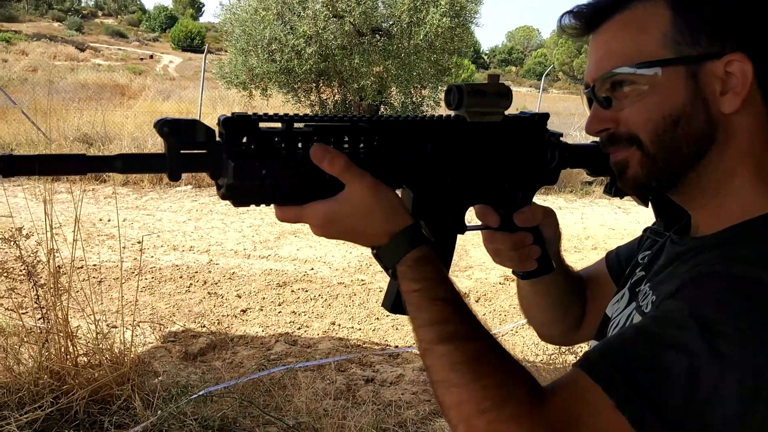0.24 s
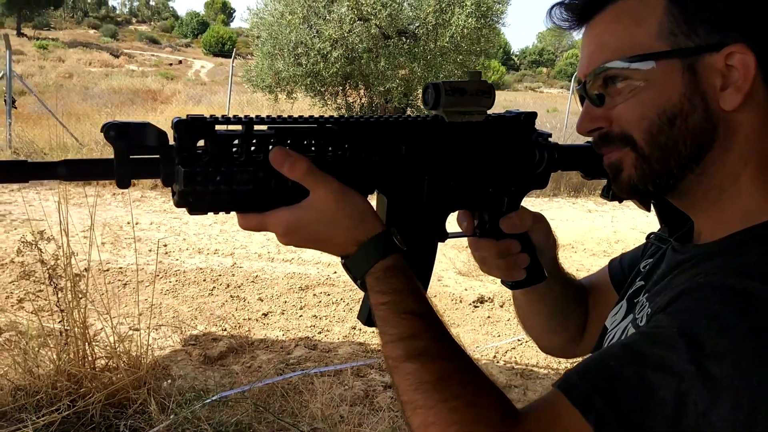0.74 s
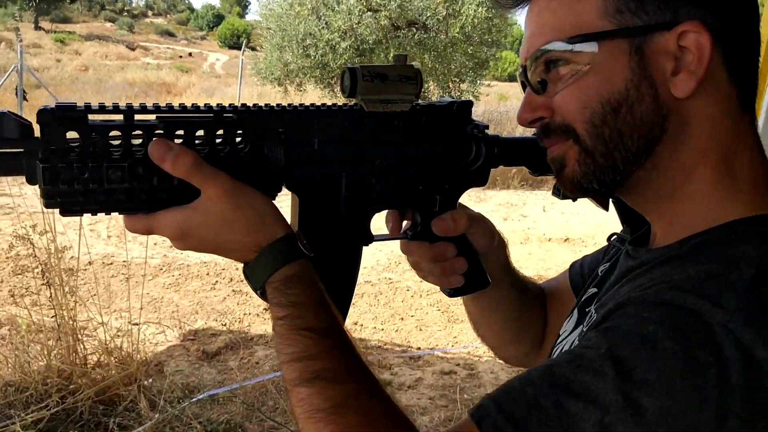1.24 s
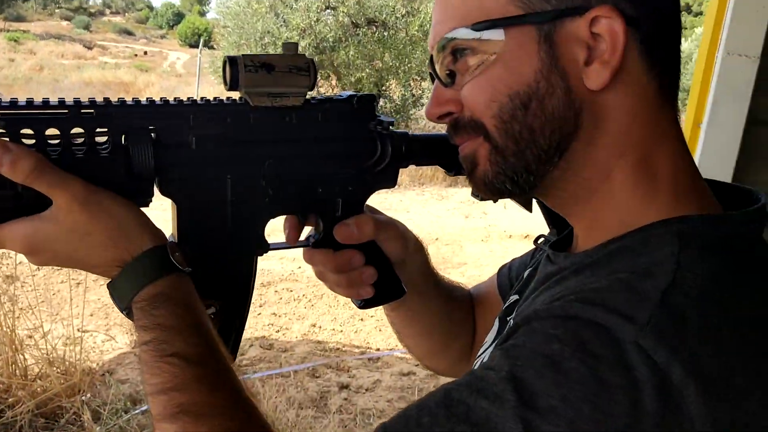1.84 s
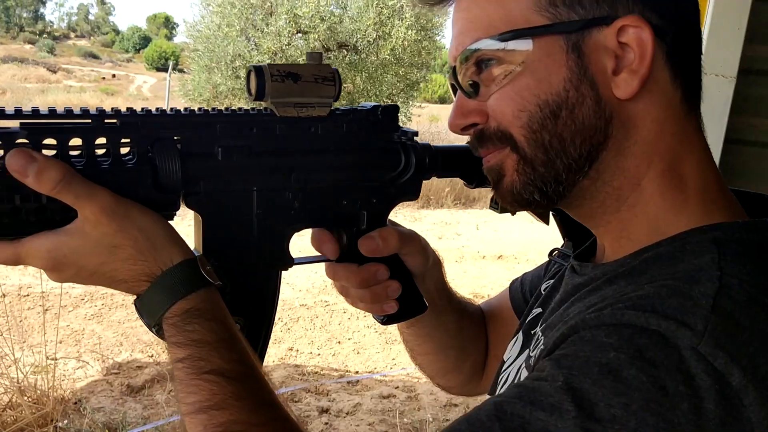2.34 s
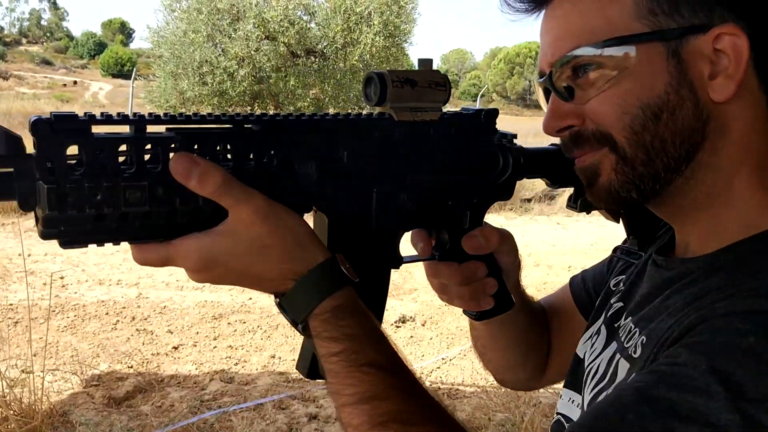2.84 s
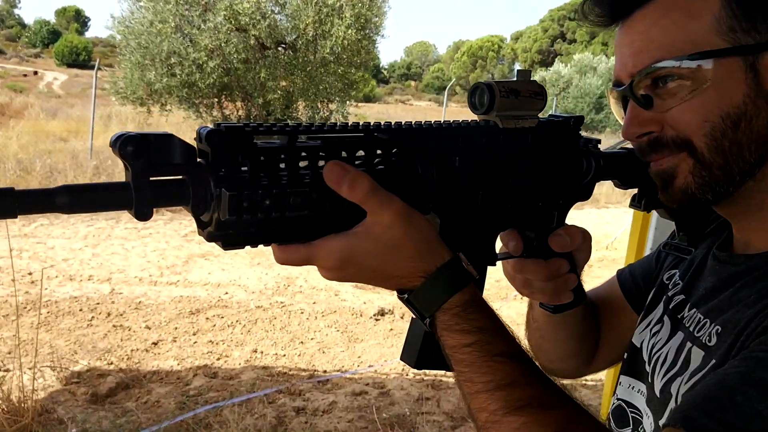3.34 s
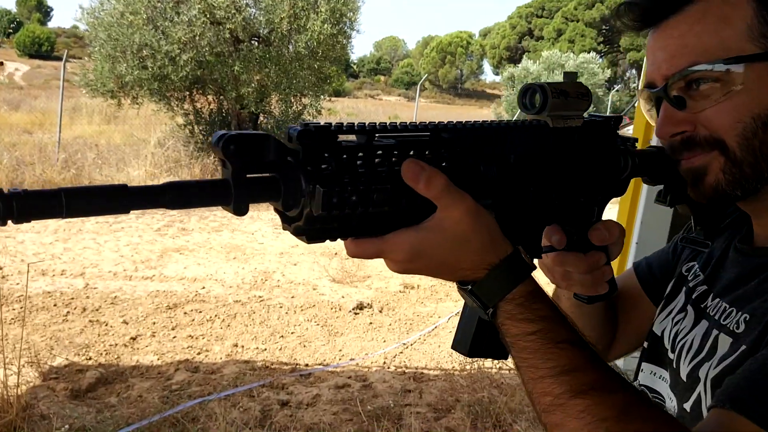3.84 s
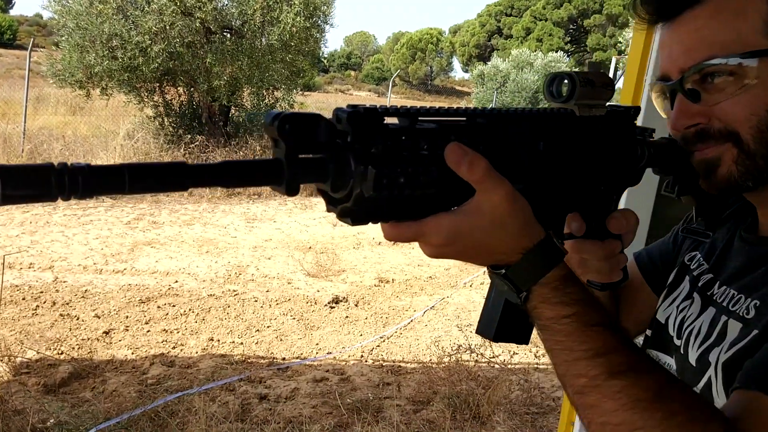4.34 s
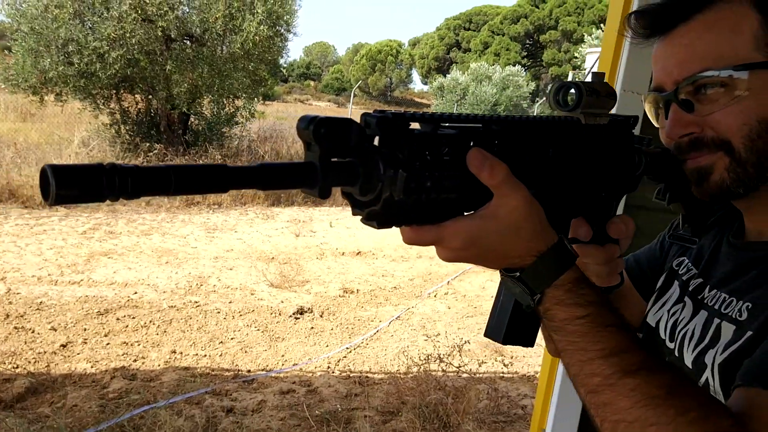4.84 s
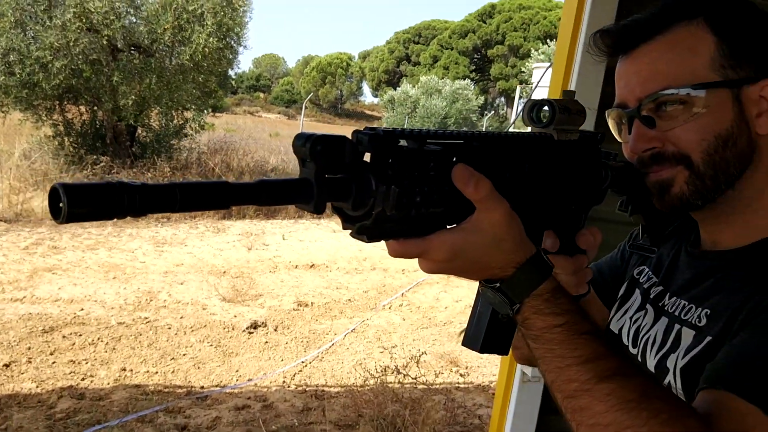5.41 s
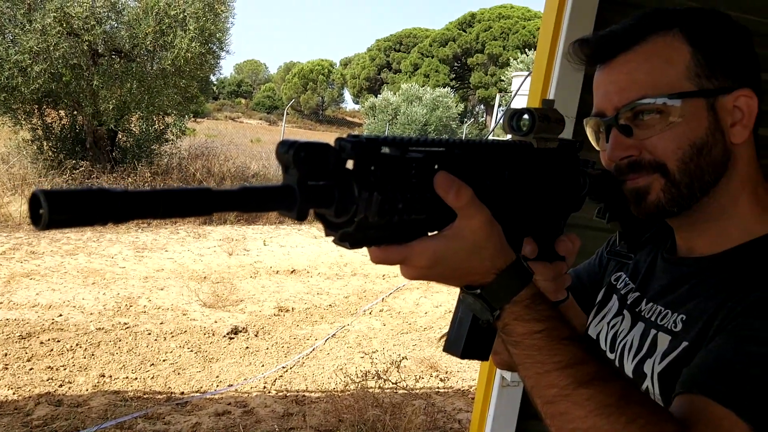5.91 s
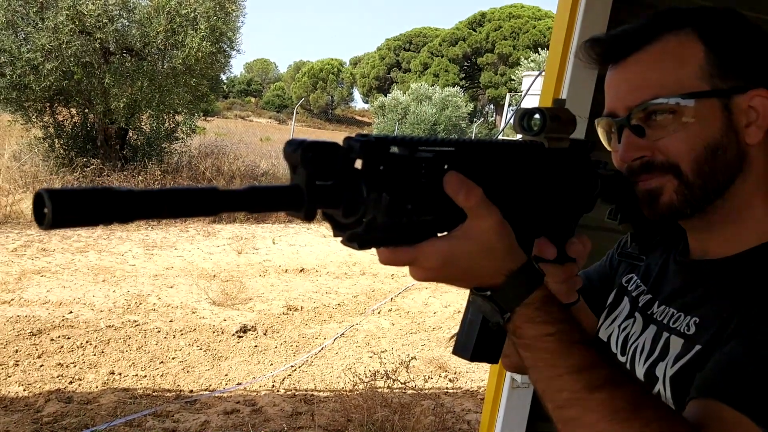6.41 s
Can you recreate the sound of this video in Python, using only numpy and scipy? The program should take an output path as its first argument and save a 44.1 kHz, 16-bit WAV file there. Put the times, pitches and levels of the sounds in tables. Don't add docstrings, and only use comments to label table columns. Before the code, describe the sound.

Outdoors under a porch roof, about a metre from a hand-held phone, an electric toy rifle fires ten single shots. Each begins with a brief rising motor whine and rattling gears, then a sharp plastic slam and a light coasting rattle. A short tail returns from roof and wall. Low wind puffs, dry finger ticks on the phone case and a few trigger clicks fill the gaps.

```python
import sys
import numpy as np
from scipy import signal
from scipy.fft import rfft, irfft, next_fast_len
from scipy.io import wavfile
from scipy.ndimage import uniform_filter1d

SR = 44100
rng = np.random.default_rng(int(sys.argv[2]) if len(sys.argv) > 2 else 0)


def persist_wave(psi):
    counts = np.round(np.clip(psi, -1, 1) * 32767).astype(np.int16)
    wavfile.write(sys.argv[1], SR, np.atleast_2d(counts).T)


def level_to_linear(level):
    exponent = np.asarray(level, float) / 20
    return 10 ** exponent


N = 294147
T = np.arange(N) / SR
PAD = next_fast_len(N, real=True)
HZ = np.arange(PAD // 2 + 1) * SR / PAD + 1

# motor on in seconds, piston slam in seconds, cocking level in dB,
# coasting level in dB, gear tone in dB.
SHOT_TIMES = [(-.27, -0.11, -17, -17, -4.5), (.232, .350, -17.5, -22.5, -14.5),
              (0.944, 1.069, -17.5, -21.5, -2.5), (1.639, 1.772, -16, -22, -4),
              (2.346, 2.478, -16.5, -23, -7), (3.047, 3.168, -16.5, -20.5, -4.5),
              (3.507, 3.636, -18.5, -22, -1.5), (3.959, 4.079, -16, -23.5, -20.5),
              (4.952, 5.0697, -18, -22.5, -3.5), (5.687, 5.809, -17.5, -23.5, -4.5),
              (6.437, 6.562, -17.5, -24.5, -6.5)]
# frequency in Hz, width in Hz, level in dB.
SHELL_RINGS = [(855, 160, -4), (1240, 12, 3), (1957, 120, -7), (3670, 330, -37), (5760, 260, -21.5),
               (6210, 97, -24), (6700, 61, -16), (7630, 98, -4.5), (8260, 40, -19.5)]
# time in seconds, steady level in dB, left minus right in dB,
# small eddies in dB.
WIND_COURSE = [(0.0, -30, 4, -16), (0.09, -47, -13, -39.5), (.55, -45.5, -3, -33), (.68, -49.5, -4, -38),
               (.85, -44, -2, -22), (1.22, -50, 7, -41), (1.35, -40, -13, -23), (1.6, -58.5, 6, -19),
               (1.82, -58, 5, -46.5), (2.1, -45.5, -13, -37), (2.4, -49, -9, -35), (2.95, -55, 10, -49),
               (3.45, -52.5, 2.5, -33.5), (4.45, -52.5, 4, -31), (4.65, -54.5, -3, -46),
               (6.54, -63, 6.5, -68.5), (6.67, -48.5, 11, -60)]


def unit(x):
    return x / np.sqrt(np.mean(x ** 2))


def curve(points):
    hz, db = np.transpose(points)
    return np.interp(np.log(HZ), np.log(hz), db)


def shape(x, gain):
    return irfft(rfft(x, PAD) * gain, PAD)[..., :N]


def colour(x, points, peaks=(), ring_db=0.):
    gain = 1
    for k, (hz, width, db) in enumerate(peaks):
        sign = (-1) ** k
        gain = gain + sign * level_to_linear(db + ring_db) / (1 + 2j * (HZ - hz) / width)
    return shape(x, level_to_linear(curve(points)) * gain)


def band(x, lo_hz, hi_hz, order=2):
    sos = signal.butter(order, [lo_hz, min(hi_hz, 20000)], "band", fs=SR, output="sos")
    return signal.sosfilt(sos, x)


def walk(rate):
    k = int(SR / rate)
    steps = np.repeat(rng.standard_normal(N // k + 1), k)
    return 1.31 * uniform_filter1d(uniform_filter1d(steps, k), k)[:N]


def patchy(x, depth_db, rate):
    spectrum = rfft(x, PAD)
    place = np.clip(1.5 * np.log2(HZ / 600), 0, 6)
    out = 0
    for k in range(7):
        part = irfft(spectrum * np.clip(1 - np.abs(place - k), 0, 1), PAD)[..., :N]
        out = out + part * level_to_linear(depth_db * walk(rate))
    return out


def rings(modes, turn, count):
    t = T[:count]
    out = 0
    for (hz, db, t60), start in zip(modes, turn):
        out = out + level_to_linear(db - 60 * t / t60) * np.sin(2 * np.pi * hz * t + start)
    return out


def ports(split_hz, scatter_db):
    hits = rng.standard_normal((3, N)) * level_to_linear(scatter_db * rng.exponential(size=(3, N)))
    shared = np.sqrt(1 / (1 + (HZ / split_hz) ** 4))
    return shape(hits[0], shared) + shape(hits[1:], np.sqrt(1 - shared ** 2))


def add(out, s, burst):
    i = int(s * SR)
    out[..., i:i + burst.shape[-1]] += burst[..., :N - i]


def rifle():
    # time in seconds, left minus right in dB, treble of the loaded gears in dB.
    aim = [(.3, -4, 4), (1.2, -2, 0.5), (2.599, -1.7, 0.5), (4, -2.5, -0.5), (5, -4, -4), (6.5, -3, -3)]
    s, *columns = np.transpose(aim)
    pan_db, treble_db = (np.interp(T, s, c) for c in columns)
    speed, cock, slam, coast, thump = drive()
    gears = cock * loaded_gears(speed, treble_db)
    sound = gears + piston(slam, thump) + coast * free_gears()
    return sound * level_to_linear(-0.76 + np.array([pan_db, -pan_db]) / 2)


def drive():
    # delay in milliseconds, level in dB, decay in milliseconds.
    blows = [
        (-4, -11, 2),
        (-2, -9, 1.5),
        (0, -4, 1.2),
        (2.8, 0, 1.6),
        (5, -5, 1.5),
        (9.5, -9, 2.5),
    ]
    spin_up_s, coast_s, grip_s = .045, 0.35, 0.02
    sag_share, sag_s = .07, .035
    speed, cock, slam, coast, thump = np.zeros((5, N))
    for on, hit, cock_db, coast_db, _ in SHOT_TIMES:
        since = np.clip(T - on, 0, 1)
        spin = np.tanh(since / (spin_up_s * (1 + .04 * rng.standard_normal())))
        sag = 1 - sag_share * np.exp(np.clip(T - hit, -1, 0) / sag_s)
        speed += spin * sag * (T < hit + .005)
        grip = .06 * (since > .011) + (1 - np.exp(-since / grip_s)) ** 2.7
        let_go = np.clip((hit + 0.00048 - T) / 0.037, 0, 1) ** 0.27
        cock += level_to_linear(cock_db) * grip * let_go
        free = (T > hit) * np.clip(1 - (T - hit) / coast_s, 0, 1)
        coast += level_to_linear(coast_db) * np.sin(free * np.pi / 2) ** 4.38
        if hit <= 0:
            continue
        for ms, db, decay_ms in blows:
            blow_db = cock_db + 9.5 + db
            luck_db = 1.8 * rng.standard_normal()
            add(slam, hit + ms / 1000, level_to_linear(blow_db) * np.exp(-T[:1500] * 1000 / decay_ms))
            add(thump, hit + ms / 1000, -level_to_linear(blow_db + luck_db) * np.ones(1))
    return speed, cock, slam, coast, thump


def loaded_gears(speed, treble_db):
    # frequency in Hz, level in dB per Hz.
    loaded = [(180, -60), (300, -20.5), (915, -7.5), (1100, -21), (1300, -6), (1560, -11.5), (2360, -7),
              (3240, -10), (4990, -2.5), (14700, -30.5), (16000, -36)]
    # frequency in Hz, width in Hz, level in dB.
    gearbox = [(944, 60, -6), (1314, 150, -1.5), (1800, 59, -0.5), (2412, 45, -5), (3627, 72, -9),
               (4200, 70, -3.5), (5020, 150, -21.5), (5700, 150, -7), (6410, 150, -12.5), (6540, 34, -14.5),
               (7460, 53, -21.5), (7780, 59, -17.5), (8030, 25, -15), (8360, 53, -19.5), (8200, 53, -21.5)]
    tone, phase = whine(speed)
    rattle = ports(1200, scatter_db=1.5) * np.exp(0.88 * np.cos(phase))
    gears = unit(patchy(colour(rattle, loaded, gearbox, ring_db=13.0), depth_db=2.5, rate=60))
    shots = np.array(SHOT_TIMES)
    tone_db = np.interp(T, shots[:, 1], shots[:, -1])
    treble = (level_to_linear(treble_db) - 1) * band(gears, 1900, 7000)
    return gears + treble + level_to_linear(tone_db) * tone


def whine(speed):
    mesh_hz = 1279.7 * speed * (1 + 0.01488 * walk(120))
    phase = 2 * np.pi * np.cumsum(mesh_hz) / SR
    tone = 0
    for k, db in ((1, 0), (1.5, -8), (2, -3), (3, -3), (4, -4), (5, -6)):  # overtone, dB
        tone = tone + level_to_linear(db + 3.5 * walk(90)) * np.sin(k * phase)
    tone = colour(tone, [(300, -40), (620, -12), (880, 5), (1100, -3), (1300, -5), (3000, -5), (7000, -9)])
    return np.array([np.roll(tone, shift=5), tone]), phase


def piston(slam, thump):
    # frequency in Hz, level in dB per Hz.
    crack_points = [(59, -61.5), (100, -31), (283, 2.5), (1280, -1), (1580, -6.5), (2580, -0.5),
                    (3860, -4.5), (5650, -3), (9020, -15.5), (12400, -16.5), (16000, -44)]
    # frequency in Hz, level in dB, time to fall 60 dB in seconds.
    cylinder = [(320, -5, .04), (620, -14, .02), (905, -1, .035), (1270, -1, .025), (2000, -9, .015),
                (2950, -4, .012)]
    crack = unit(colour(ports(2200, scatter_db=1.5), crack_points, SHELL_RINGS, ring_db=5.0))
    body = signal.fftconvolve(thump, rings(cylinder, np.zeros(len(cylinder)), count=3000))[:N]
    body = np.array([np.roll(body, shift=6), level_to_linear(-3.5) * body])
    return level_to_linear(3.0) * slam * crack + level_to_linear(-4.0) * body


def free_gears():
    # frequency in Hz, level in dB per Hz.
    free_points = [(88, -46), (150, -12.5), (264, -4.5), (675, -10), (854, -5), (1120, -5.5), (1240, -6),
                   (3160, -9), (5680, -7.5), (14500, -24.5), (16000, -34)]
    rattle = colour(ports(1700, scatter_db=1.5), free_points, SHELL_RINGS, ring_db=5.5)
    return unit(patchy(rattle, depth_db=1.5, rate=50))


def trigger():
    # time in seconds, level in dB.
    clicks = [
        (4.705, -24.5),
        (4.7135, -32.5),
        (4.957, -37.5),
        (5.6737, -22.5),
        (5.681, -24.5),
    ]
    # frequency in Hz, level in dB, time to fall 60 dB in seconds.
    latch = [(980, -2, .018), (2050, -3, .016), (3530, -1, .012), (4250, -6, .009), (5400, -7, .008),
             (7750, -3, .006), (11800, -9, .005)]
    out = np.zeros(N)
    for s, db in clicks:
        snap = rings(latch, rng.uniform(0, 2 * np.pi, len(latch)), count=2000)
        scrape = band(rng.standard_normal(len(snap)), 900, 12000) * np.exp(-T[:len(snap)] / .0015)
        add(out, s, level_to_linear(db) * (snap + 1.9 * scrape))
    out = band(out, 600, 18000)
    return np.array([np.roll(out, shift=11), out])


def porch(x, db, top_hz):
    t = T[:SR // 2]
    tail = band(rng.standard_normal((2, len(t))), 790, top_hz, order=1) * level_to_linear(-60 * t / 0.55) * (t > .005)
    far = band(rng.standard_normal((2, len(t))), 1820, 2430) * level_to_linear(-60 * t / 1.08) * (t > .03)
    tail = tail + level_to_linear(-16.5) * far
    tail = tail / np.sqrt(np.sum(tail ** 2) / 2)
    return x + level_to_linear(db) * signal.fftconvolve(x, tail, axes=1)[:, :N]


def fingers():
    # time in seconds, peak level in dB, dull part against the bright in dB.
    ticks = [(1.2748, -25.5, -2), (1.3376, -16.5, -19), (1.3485, -25, -17), (1.373, -13.5, -27.5),
             (1.4016, -8, -17.5), (1.411, -21, -25), (1.4996, -20.5, -23), (1.5383, -18, -27),
             (1.5532, -18, -28), (1.603, -25, -20), (1.6319, -25, -11), (1.9956, -11, -16),
             (2.183, -11, -17), (2.242, -26, -23), (2.7407, -29.5, -13), (4.3462, -25, -23),
             (4.3833, -22.5, -35), (4.389, -25, -30), (4.416, -7.5, -20), (4.487, -17, -35),
             (4.5104, -22.5, -28), (4.7666, -23, -1), (4.8567, -20.5, -24), (4.9357, -24.5, -27),
             (5.3263, -29, -11), (5.3476, -32, 9), (6.2471, -17.5, -26), (6.301, -21.5, -23),
             (6.3676, -24, -13)]
    # start in seconds, length in seconds.
    creeps = [
        (1.35, 0.097),
        (1.558, .045),
        (2.018, 0.25),
        (4.46, .04),
        (5.332, .22),
    ]
    bright, dull = np.zeros((2, N))
    faint = []
    for s, length in creeps:
        for _ in range(3):
            faint.append((s + length * rng.random(), -32 + 2 * rng.standard_normal(), -20))
    for s, db, dull_db in ticks + faint:
        add(bright, s - .0001, level_to_linear(db) * np.array([1, -.4, .2]))
        add(dull, s - .0002, level_to_linear(db + dull_db) * np.ones(1))
    skin = 2.44 * band(bright, 7070, 15000) + 5 * band(dull, 500, 4500, order=1)
    return np.array([skin, level_to_linear(-38.0) * skin]) + finger_knock()


def finger_knock():
    # time in seconds, level in dB, frequency in Hz, right port against left in dB.
    knock_row = (3.9228, -9.5, 560, -10)
    s, db, hz, right_db = knock_row
    out, t = np.zeros(N), T[:900]
    swell = t / .001 * np.exp(1 - t / .001) + .15 * np.tanh(t / .001) * np.exp(-t / .004)
    add(out, s, level_to_linear(db) * np.sin(2 * np.pi * hz * t * (1 + np.exp(-t / 0.0016))) * swell)
    add(out, s + .0004, level_to_linear(-17) * np.sin(2 * np.pi * 2700 * t) * np.exp(-t / 0.00054))
    return np.array([out, level_to_linear(right_db) * out])


def gusts():
    # time in seconds, peak in dB, frequency in Hz, length in ms.
    windward = [(0.002, -11.5, 273, 4), (0.024, -19, 275, 8), (0.104, -20, 310, 11), (0.133, -7.5, 268, 6),
                (0.475, -16.5, 260, 3.7), (0.52, -13, 225, 8), (0.533, -16, 242, 11),
                (0.59, -10.5, 267, 5.2), (0.751, -23.5, 254, 8.2), (0.834, -13.5, 246, 4.4),
                (0.859, -20, 245, 14), (0.877, -10.5, 257, 4.6), (0.931, -23.5, 235, 14),
                (1.35, -12, 257, 4), (1.364, -15, 209, 10.2), (1.448, -19.5, 220, 19),
                (1.477, -16.5, 279, 7.6), (1.631, -22.5, 222, 8.3), (2.053, -22.5, 250, 5.7),
                (2.094, -19.5, 246, 6), (2.164, -19.5, 246, 6.6), (2.258, -10.5, 228, 6.3),
                (2.447, -14.5, 240, 5.5), (3.458, -24.5, 205, 11), (3.882, -10.5, 249, 9.2),
                (3.948, -26.5, 216, 7.5), (4.218, -21.5, 208, 4.2), (4.425, -14, 246, 5.5),
                (5.384, -18.5, 193, 7), (5.596, -24, 240, 9.2)]
    # time in seconds, peak in dB, frequency in Hz.
    sheltered = [(0.085, -29, 255), (1.13, -35, 296), (2.742, -31.5, 244), (2.792, -31, 247),
                 (2.857, -37, 224), (2.918, -36, 265), (2.996, -26.5, 233), (3.014, -31, 202),
                 (3.293, -31, 335), (3.724, -30, 323), (4.826, -27.5, 253), (5.236, -32, 234)]
    out = np.zeros((2, N))
    for port, rows in enumerate(([(*row, 9.7) for row in sheltered], windward)):
        for s, db, hz, ms in rows:
            rise, burst = eddy(db, hz, ms)
            add(out[port], max(s - rise, 0), burst)
    return out


def eddy(db, hz, ms):
    t, rise = T[:3000], max(ms, 2) / 1700
    swell = (t / rise * np.exp(1 - t / rise)) ** 2
    cycle = 2 * np.pi * hz * t * (1 + 0.42 * np.exp(-t / 0.0023)) + rng.uniform(0, 2 * np.pi)
    return rise, level_to_linear(db) * swell * (np.sin(cycle) + .22 * swell * np.sin(2 * cycle))


def breeze():
    s, *columns = np.transpose(WIND_COURSE)
    db, pan_db, small_db = (np.interp(T, s, c) for c in columns)
    out = np.zeros((2, N))
    for port, side in enumerate((1, -1)):
        flow = unit(band(rng.standard_normal(N), 150, 330))
        out[port] = flow * level_to_linear(db + side * pan_db / 2 + 4.66 * walk(40))
    out = out + level_to_linear(db - 11) * unit(band(rng.standard_normal(N), 23, 90))
    for i, chance in zip(rng.integers(N, size=130), rng.standard_normal((130, 3))):
        size_db = small_db[i] + 3 * chance[0]
        hz, ms = 230 * (1 + .13 * chance[1]), 8.2 * np.exp(.3 * chance[2])
        add(out[1], i / SR, eddy(size_db, hz, ms)[1])
    return out


def surroundings():
    # frequency in Hz, level in dB per Hz.
    field = [(180, -51), (300, -13), (713, -5), (787, -9.5), (1190, -16), (1320, -13.5), (2140, -13),
             (5800, -18.5), (7950, -18.5), (16000, -18.5)]
    return unit(colour(rng.standard_normal((2, N)), field)) * level_to_linear(-58 + 0.56 * walk(1.8))


def scene():
    # frequency in Hz, left minus right in dB.
    port_tilt = [(60, 9.5), (400, 3), (1300, -1), (2400, -8), (4400, 0), (8000, 3), (16000, 2.5)]
    gun = porch(rifle(), db=-16, top_hz=5000) + porch(trigger(), db=-5.5, top_hz=8000)
    gun = shape(band(gun, 170, 19000, order=3), level_to_linear(np.outer([.5, -.5], curve(port_tilt))))
    gun = gun + 1.3 * band(gun, 13700, 15900, order=1)
    return gun + fingers() + gusts() + breeze() + surroundings()


def band_limit(x):
    return signal.sosfilt(signal.butter(12, 16590, fs=SR, output="sos"), x)


def record(dry):
    x = band(dry, 110, 23000, order=2)
    x = signal.sosfilt(signal.ellip(8, .3, 60, 16200, fs=SR, output="sos"), x)
    return band_limit(np.clip(x, -.98, .98))


dry = scene()
out = record(dry)
persist_wave(out)
```